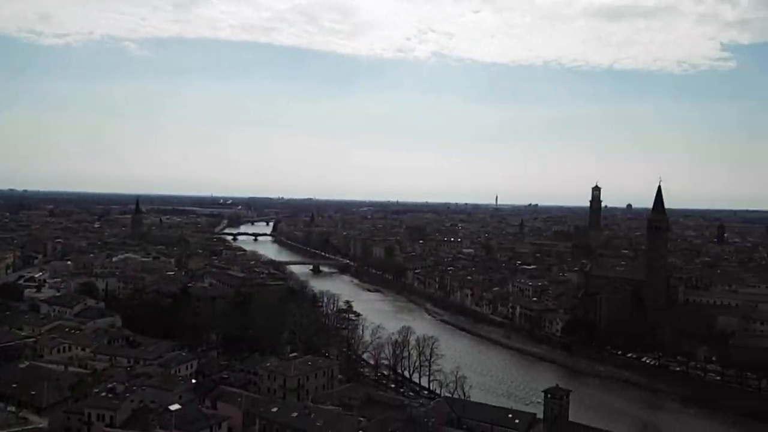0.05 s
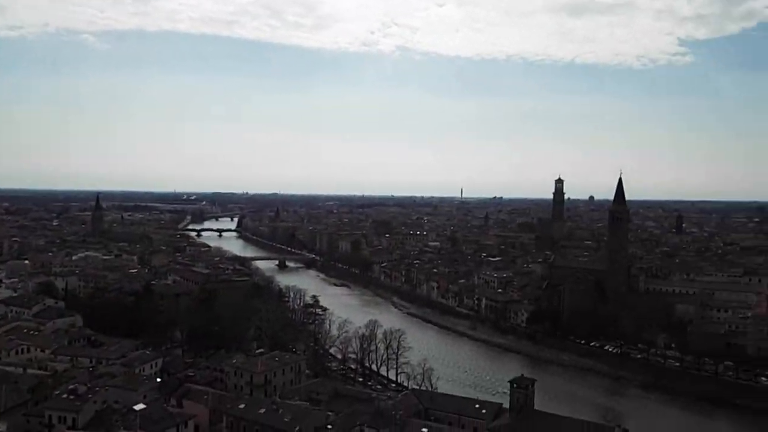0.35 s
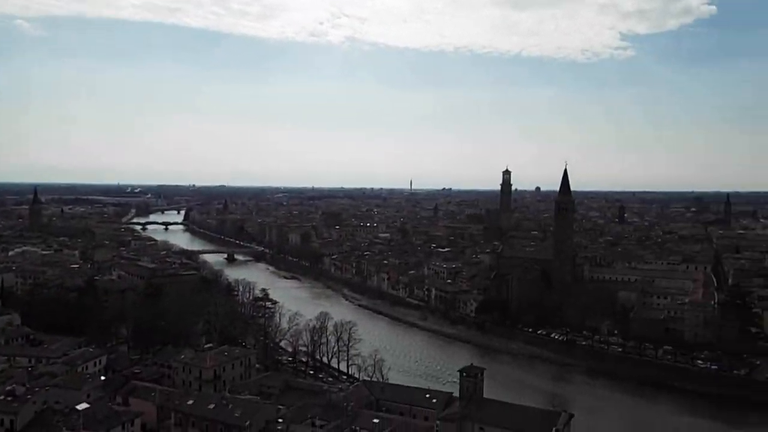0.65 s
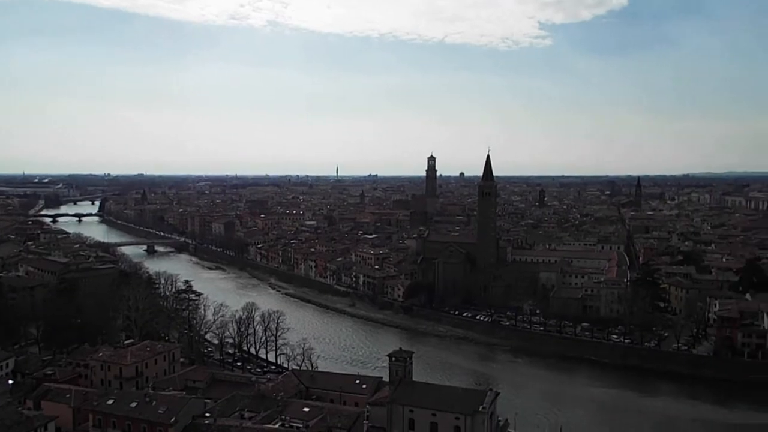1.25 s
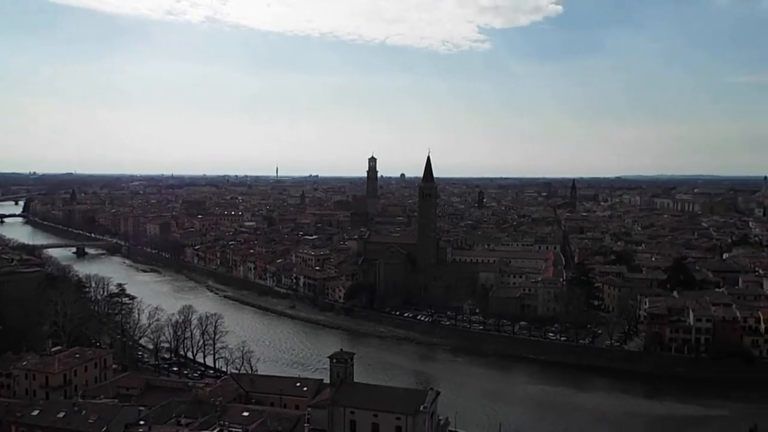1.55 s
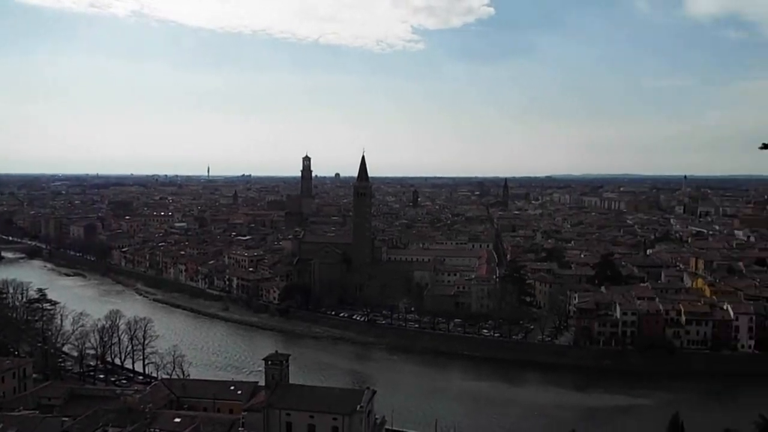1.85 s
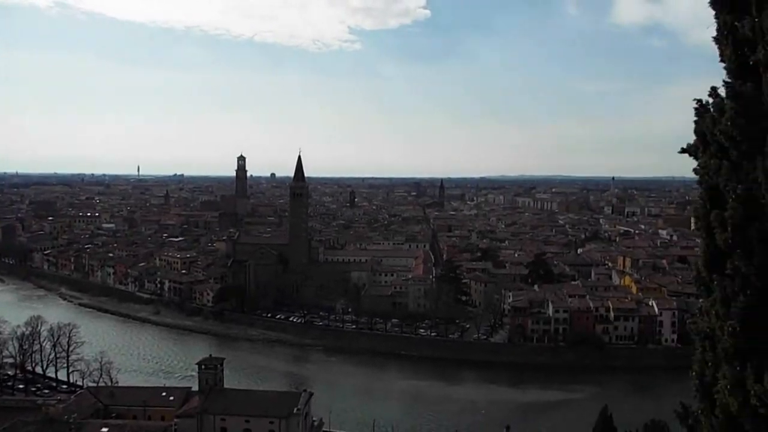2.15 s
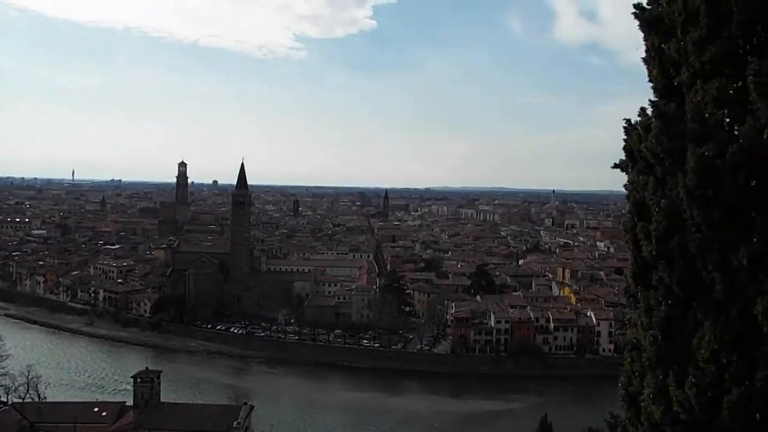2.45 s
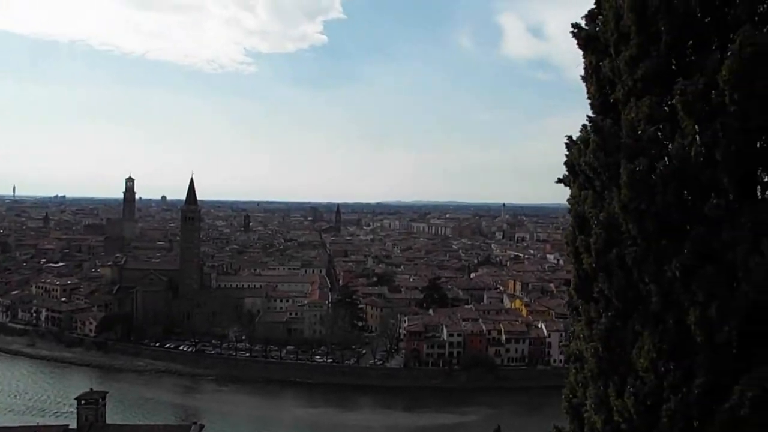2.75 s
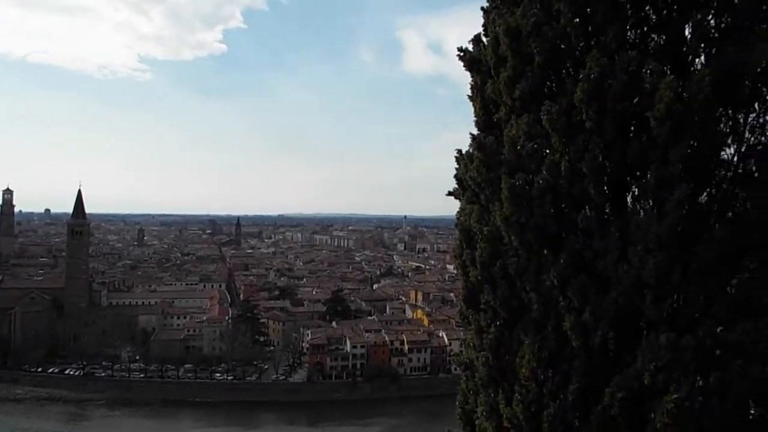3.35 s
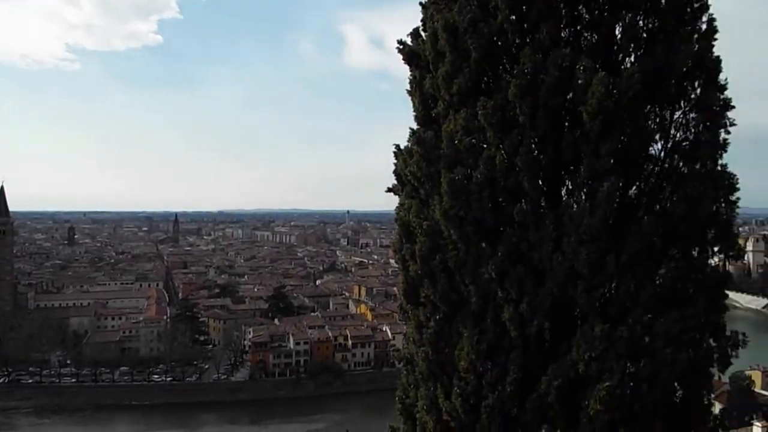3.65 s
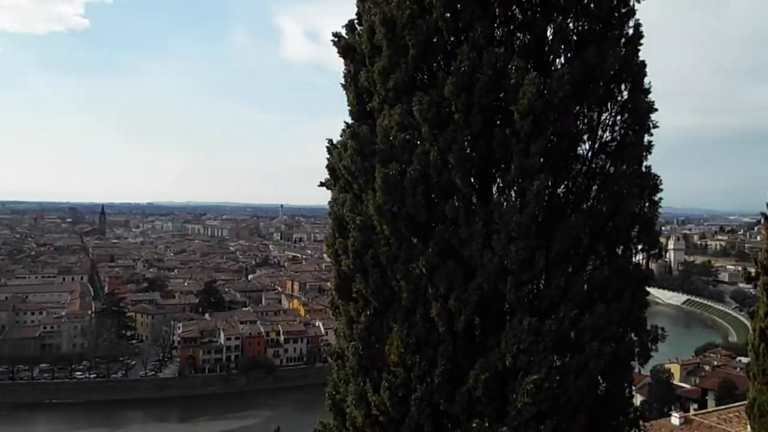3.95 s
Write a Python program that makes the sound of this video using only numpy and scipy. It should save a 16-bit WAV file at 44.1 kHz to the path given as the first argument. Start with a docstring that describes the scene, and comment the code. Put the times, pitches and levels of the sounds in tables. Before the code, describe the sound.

Gusty wind buffets the microphone, with faint metal clinks and a distant town behind.

```python
"""Gusty wind buffets a stereo microphone on a hill above a town. It opens mid-gust: eddies sweep past
each port, louder and higher the faster the air, and tight ones slap it, while a small bird whistles.
Lulls around 0.5 s and 1 s uncover the distant town and a little metal fitting that clinks now and then.
The hardest gust peaks near 2 s, crackling and overloading the recorder. A choppy lull with soft rustles
follows; one more gust hits just after 3 s and eases off in scattered buffets and a last few clinks."""
import sys
import numpy as np
from scipy import signal
from scipy.fft import rfft, irfft
from scipy.io import wavfile
from scipy.ndimage import map_coordinates

SR = 44100
rng = np.random.default_rng(int(sys.argv[2]) if len(sys.argv) > 2 else 0)


def dump_mix(stems):
    """Bounce the given channels to the path in sys.argv[1] as a 16-bit WAV at rate SR."""
    frames = np.atleast_2d(stems).T  # one column per channel
    limited = np.clip(frames, -1, 1)  # hard clip at full scale
    pcm = np.round(limited * 32767).astype(np.int16)
    wavfile.write(sys.argv[1], SR, pcm)


N = 176400
TIME = np.arange(N) / SR


def amp(db):
    """Decibels to gain."""
    return 10 ** (np.asarray(db) / 20)


def unit(x):
    """Scales to rms 1."""
    return x / np.sqrt(np.mean(x ** 2) + 1e-20)


def add(mix, start, sound):
    """Mixes a sound in at a start time in seconds."""
    part = mix[max(round(start * SR), 0):][:len(sound)]
    part += sound[:len(part)]


def noise(spectrum):
    """Noise of rms 1, shaped by an EQ curve."""
    hz, db = np.transpose(spectrum)
    f = np.fft.rfftfreq(N, 1 / SR)
    eq = amp(np.interp(np.log(f + 1), np.log(hz), db)) * (f > 0)
    return unit(irfft(rfft(rng.standard_normal(N)) * eq, N))


def stereo_noise(spectrum, correlation):
    """Shaped noise, from fully wide (correlation 0) to mono (1)."""
    centre = noise(spectrum)
    sides = np.array([noise(spectrum), noise(spectrum)])
    return np.sqrt(correlation) * centre + np.sqrt(1 - correlation) * sides


def wobble(top_hz):
    """Random modulator of rms 1, from a tenth of top_hz to a roll-off at top_hz."""
    f = np.fft.rfftfreq(N, 1 / SR) / top_hz
    return unit(irfft(rfft(rng.standard_normal(N)) * np.exp(-f ** 2 / 2) * (f > 1 / 10), N))


# EQ of the town bed: f/Hz, level/dB
TOWN_EQ = [(60, 5), (250, 8.5), (480, 0.5), (760, 4), (1100, -5), (1600, -9), (2600, -16), (4200, -24.5),
           (6500, -29.5), (9500, -35.5), (13000, -38), (16000, -38)]
def town():
    """The distant town and hiss: a steady, nearly mono bed."""
    return amp(-34.5) * stereo_noise(TOWN_EQ, correlation=0.82)


# Whistle cues: t/s, length/s, level/dB, start f/Hz, middle f/Hz, end f/Hz
WHISTLES = [(0.062, 0.07, -50, 2950, 3130, 3120), (0.215, 0.092, -42, 3810, 3000, 2970),
            (0.517, 0.045, -47.5, 2810, 3090, 2860)]
def bird():
    """A small bird's thin, wavering whistles, each bending through three pitches."""
    out = np.zeros(N)
    for start, length, db, *pitches in WHISTLES:
        progress = np.arange(0, length, 1 / SR) / length
        waver = 1 + 0.017 * wobble(150)[:len(progress)]
        hz = np.interp(progress, [0, .35, 1], pitches) * waver
        envelope = amp(db) * np.abs(np.sin(np.pi * progress)) ** .5
        add(out, start, envelope * np.sin(2 * np.pi * np.cumsum(hz) / SR))
    return out


# Rustle cues: centre t/s, half width/s, level/dB
RUSTLES = [(2.373, 0.034, -53), (2.417, 0.019, -53), (3.349, 0.037, -57.5), (3.506, 0.032, -52),
           (3.98, .06, -49.5)]
# EQ of the friction: f/Hz, level/dB
RUSTLE_EQ = [(1500, -4), (2500, 4.5), (4500, 2), (9000, -4), (12000, -17), (16000, -15)]
def rustles():
    """Soft swells of grainy friction close to the microphone."""
    swell = sum(amp(db) * np.exp(-((TIME - centre) / width) ** 2) for centre, width, db in RUSTLES)
    grain = amp(2.5 * wobble(300))
    return swell * grain * stereo_noise(RUSTLE_EQ, correlation=0.2)


# Taps on the fitting: t/s, level/dB, brightness/(dB per octave), ring length factor
CLINKS = [(.212, -42, 15, 1), (.219, -35, 10.5, 0.8), (.935, -47, -8, 0.97), (0.988, -39, -5, 1),
          (1.003, -41, -6, 1), (1.248, -43, 16, 0.36), (1.510, -29, -5.5, 0.28), (1.52, -35.5, -12, 0.4),
          (2.859, -43, 11, 0.25), (3.449, -26.5, -15, 0.46), (3.529, -39, -4.5, 0.21)]
# Modes of the fitting: f/Hz, level/dB, 60 dB decay/s
METAL_MODES = [(4400, -18, 0.055), (5790, -9, 0.088), (6460, -8, 0.086), (6480, -6, .08), (7340, -19, .06),
               (8220, -8.5, 0.034), (8900, -14.5, 0.055), (9800, -15, .06)]
def clinks():
    """A small metal fitting ticks on contact and rings; each tap lands elsewhere, so its tone varies."""
    out, t = np.zeros((2, N)), np.arange(SR // 5) / SR
    hz, mode_db, t60 = np.transpose(METAL_MODES)[:, :, None]
    tick_band = signal.butter(2, [4200, 10500], "band", fs=SR, output="sos")
    attack = np.minimum(t / 0.00028, 1)
    for start, db, brightness, ring in CLINKS:
        detuned_hz = hz * (1 + 0.0053 * rng.standard_normal(hz.shape))
        for channel, pan_db in zip(out, (-0.5, 0.5)):
            struck_db = mode_db + brightness * np.log2(hz / 6400) + 3 * rng.standard_normal(hz.shape)
            partials = np.sin(2 * np.pi * (detuned_hz * t + rng.random(hz.shape) / 2))
            modes = (amp(struck_db - 60 * t / (t60 * ring)) * partials).sum(0)
            scrape = unit(signal.sosfilt(tick_band, rng.standard_normal(len(t))))
            tick = amp(-10.5) * scrape * np.exp(-t / (0.013 * ring ** 2))
            add(channel, start, amp(db + pan_db) * (modes + tick) * attack)
    return out


# EQ of the low end: f/Hz, level/dB
RUMBLE_EQ = [(8, -15), (22, -11), (42, -8), (70, -12), (130, -24.5), (220, -21.5), (500, -39),
             (2000, -91.5)]
# Level of the rumble, dipping in the lulls: t/s, level/dB
RUMBLE_LEVEL = [(0.0, -7), (0.43, -12), (0.46, -31), (0.69, -14.5), (0.71, -16.5), (0.86, -14.5),
                (0.98, -18.5), (1.04, -32), (1.08, -16.5), (2.35, -13.5), (2.375, -27), (2.416, -29.5),
                (2.43, -16), (2.504, -16.5), (2.53, -31), (2.565, -33), (2.59, -15), (2.755, -13.5),
                (2.775, -37), (2.8, -35), (2.82, -20.5), (2.9, -36.5), (2.97, -15.5), (3.04, -25),
                (3.07, -14), (3.54, -25), (3.75, -11.5), (3.8, -23.5), (3.98, -20.5), (4.0, -23)]
def rumble():
    """Slow pressure swings around the whole microphone, partly shared by both ports."""
    level_db = np.interp(TIME, *np.transpose(RUMBLE_LEVEL))
    return amp(level_db - 1) * stereo_noise(RUMBLE_EQ, correlation=0.22)


def crackle(force_db):
    """The smallest eddies pop at a port, thicker and louder as the force grows."""
    strength = amp(np.minimum(force_db, 3))
    pops_per_s = 170 * strength
    pops = (rng.random(N) < pops_per_s / SR) * rng.standard_normal(N)
    lowpass = signal.butter(1, 2600, fs=SR)
    return amp(-20.5) * signal.lfilter(*lowpass, pops * np.sqrt(strength))


# EQ of the eddies at nominal air speed: f/Hz, level/dB
EDDY_EQ = [(15, 8.5), (60, 3), (180, 3), (360, 3), (520, -5), (750, -10.5), (1050, -24.5), (1500, -32),
           (2200, -55.5), (4000, -81), (12000, -87)]
def eddies(force_db, shift_octaves):
    """A frozen field of eddies is carried past a port, so air speed sets both pitch and level."""
    flutter_db, shiver_db = 3 * wobble(50.23), 2 * wobble(260.5)
    force_db = force_db + flutter_db + shiver_db
    speed = np.minimum(2 ** (force_db / 13 + shift_octaves), 2)  # 13 dB of force doubles the speed
    pressure = map_coordinates(noise(EDDY_EQ), [np.cumsum(speed)], order=3, mode="wrap")
    return amp(-8.5 + 0.3 * force_db) * pressure + crackle(force_db)


NOMINAL_FORCE_DB = -12  # force of the air at nominal speed
# Force envelope of the gusts: t/s, left level/dB, right level/dB
GUSTS = [(0.0, -15.0, -19.0), (0.233, -17.5, -22.0), (0.39, -15.0, -16.5), (0.41, -26, -26),
         (0.439, -18, -20), (0.5, -22.0, -23.0), (0.512, -46.0, -44.0), (0.551, -48.5, -46),
         (0.601, -31, -32.5), (0.704, -30, -31), (0.729, -46, -46), (0.78, -29.0, -31.0),
         (0.88, -22.0, -23.5), (0.97, -46.5, -46.0), (1.043, -53.5, -54.0), (1.151, -27.0, -34.0),
         (1.28, -17.0, -22.0), (1.43, -19, -22), (1.453, -32, -34), (1.49, -18, -23), (1.555, -21, -25),
         (1.585, -30, -32), (1.65, -12.0, -14.0), (2.09, -12.0, -14), (2.23, -18.0, -18.0),
         (2.34, -27, -31), (2.385, -58.0, -58.0), (2.49, -46, -46.5), (2.555, -58, -58), (2.7, -52, -51.5),
         (2.785, -55.5, -56), (2.871, -34.5, -36), (2.91, -48.0, -46.0), (3.03, -29.0, -31.0),
         (3.15, -14.0, -11.5), (3.22, -23.5, -20), (3.3, -31.5, -23.0), (3.47, -34.5, -38.0),
         (3.61, -26.0, -34.5), (3.76, -32, -36), (3.8, -48.5, -48.0), (3.93, -47.5, -46),
         (4.0, -35.0, -38.0)]
# Buffets, short peaks of force: centre t/s, length/s, left level/dB, right level/dB
BUFFETS = [(0.031, 0.013, -3.0, -5.0), (0.089, 0.053, -11.0, -16.0), (0.167, 0.032, -9.0, -12.0),
           (0.316, 0.074, -9, -12.5), (0.368, 0.025, -7, -10), (0.436, 0.016, -6.0, -8.0),
           (0.483, 0.024, -13.0, -13.5), (0.569, 0.017, -17.0, -17), (0.631, 0.043, -18.5, -18.5),
           (0.692, 0.033, -19.0, -12.0), (0.858, 0.027, -10.0, -12.5), (1.11, 0.035, -17.5, -21.5),
           (1.204, 0.022, -9.5, -13.0), (1.358, 0.028, -6.0, -7.0), (1.424, 0.025, -8.0, -12.0),
           (1.52, 0.035, -8.0, -16.0), (1.672, 0.055, -6.0, -5.0), (1.762, 0.024, -6.0, -8.0),
           (1.845, 0.03, -8.0, -10.0), (1.986, 0.039, -8.5, -10), (2.107, 0.019, -10.0, -14.0),
           (2.194, 0.031, -15.0, -12.0), (2.237, 0.014, -11, -15), (2.455, 0.049, -15.5, -16.5),
           (2.507, 0.038, -25, -28), (2.596, 0.02, -15, -12), (2.672, 0.032, -18.0, -28.0),
           (2.73, 0.045, -14.5, -15), (2.814, 0.0165, -18.0, -34.5), (2.852, 0.026, -15.0, -16.0),
           (2.976, 0.044, -19.0, -18), (3.095, 0.064, -11.0, -8.0), (3.169, 0.074, -7.5, -7.5),
           (3.241, 0.017, -11.0, -5.5), (3.287, 0.011, -22, -14), (3.308, 0.00883, -22, -12.5),
           (3.367, 0.023, -21, -20.0), (3.42, 0.032, -28.0, -17.5), (3.508, 0.015, -18.0, -33.0),
           (3.571, 0.023, -16.5, -24.5), (3.654, 0.038, -19.5, -24), (3.724, 0.059, -19.5, -21.5),
           (3.959, 0.027, -13.5, -8.0)]
def wind_force(port):
    """Force of the air at one port in dB over nominal: the gust, lifted by each buffet."""
    gusts = np.array(GUSTS)
    gust_db = np.interp(TIME, gusts[:, 0], gusts[:, 1 + port])
    force_db = gust_db
    for centre, length, *peaks_db in BUFFETS:
        swell = np.exp(-np.abs((TIME - centre) / (.72 * length)) ** 4)  # flat top, steep flanks
        force_db = np.maximum(force_db, gust_db + swell * (peaks_db[port] - gust_db))
    return force_db - NOMINAL_FORCE_DB


def thumps():
    """The big eddy at the front of each buffet: a round thump that reaches the ports out of step."""
    out, t = np.zeros((2, N)), np.arange(-SR // 40, SR // 40) / SR
    for centre, length, *peaks_db in BUFFETS:
        hz = 28.7 / np.sqrt(length)  # shorter buffets thump higher
        cycles = t * hz
        envelope = np.exp(-(cycles / 0.65) ** 2)
        front = centre - 0.206 * length
        for channel, peak_db in zip(out, peaks_db):
            swing = envelope * np.sin(2 * np.pi * (cycles + rng.random()))
            add(channel, front + t[0], amp(-3.5 + 0.53 * (peak_db - NOMINAL_FORCE_DB)) * swing)
    return out


# Slap hits: t/s, left level/dB, right level/dB, f/Hz
SLAPS = [(0.0225, 5.5, -27, 330), (0.0322, 3.5, 0, 620), (0.0685, 2, -13, 467), (0.113, 8, -12, 287),
         (0.1672, -13, 1.5, 570), (0.206, 2, -10, 490), (0.3003, 1, -12, 706), (0.3332, 1.5, -4, 561.9),
         (0.3529, 5.5, -12, 400), (0.3919, 1, -4, 756), (0.4274, -2, -3, 513), (0.503, -17, 4.5, 640),
         (0.687, -19, -0.5, 430), (0.8446, 5.5, -4, 200.2), (0.8525, -2, 0, 679.9),
         (1.2319, 5.5, -4.5, 430), (1.3159, -1, -9.5, 580.2), (1.39, -4, 0.5, 627),
         (1.472, 3.5, -14, 379.6), (1.5272, 6.5, -2, 483.6), (1.568, 5.5, -10, 419.7),
         (1.7535, 2.5, -3, 735), (1.8074, -2.5, 4, 840), (1.858, 5, -6, 616), (1.913, 3, -7, 416),
         (1.9825, 3.5, 0, 699.1), (2.111, 3.5, -5, 479.7), (2.2369, 5.5, -5, 519.3), (2.437, 7, 0, 164.5),
         (2.715, 1, -1, 330), (2.813, 0.5, -12.5, 120.7), (2.848, 1, 0.5, 170.1), (2.989, -10, 6, 500),
         (3.068, -4.5, -1, 679.3), (3.1484, -0.5, -0.5, 761.2), (3.1985, 3, 3, 698.7),
         (3.237, -0.5, 2, 621.2), (3.2408, -8.5, 3, 559.8), (3.2791, -12, 2.5, 424.3),
         (3.5094, 2, -10, 380.6), (3.95, -10, -1, 476.3)]
def slaps():
    """A tight eddy hits a port head-on, swinging the pressure one way and snapping it back."""
    out, t = np.zeros((2, N)), np.arange(-SR // 60, SR // 60) / SR
    for centre, *levels_db, hz in SLAPS:
        phase, polarity = 2 * np.pi * hz * t, rng.choice([-1, 1])
        envelope = np.exp(-(t * hz / 0.66) ** 2)
        snap = 0.39 * np.tanh(phase)  # steepens the middle of the swing
        for port, db in enumerate(levels_db):
            offset = (port != np.argmax(levels_db)) * np.pi / 2  # the weaker port is out of step
            swing = envelope * np.sin(phase + offset + snap)
            add(out[port], centre + t[0], polarity * amp(db - 3.5) * swing)
    return out


# Colour of the wind as the microphone turns in it: t/s, pitch shift/octaves, level/dB
MIC_TURN = [(0, -0.086, -1.5), (0.44, -0.026, 0), (0.6, -0.26, 0.5), (1.098, -.2, 2), (1.4, -0.069, 1),
            (1.849, 0.09, -0.5), (2.3, -.2, 0), (2.45, -0.29, 1.5), (2.85, -0.32, 1.5), (3.079, .2, -1),
            (3.171, 0.11, 0), (3.3, 0.38, -3), (3.6, 0.095, -1.5), (4, -.05, -1)]
def wind():
    """Each port has its own eddies; both surge together, over the rumble and thumps."""
    times, octaves, db = np.transpose(MIC_TURN)
    shift_octaves, turn_db = np.interp(TIME, times, octaves), np.interp(TIME, times, db)
    surge_db = 1.62 * wobble(50.23)
    low_end = rumble()
    ports = np.array([eddies(wind_force(port) + surge_db, shift_octaves) for port in range(2)])
    return amp(turn_db) * (low_end + ports + thumps())


def scene():
    """Wind and slaps up front; town, clinks, rustles and bird behind them."""
    return wind() + slaps() + town() + clinks() + rustles() + bird()


# EQ of the overloaded input's sputter: f/Hz, level/dB
SPUTTER_EQ = [(500, -9.5), (2000, 12.5), (4000, 2), (8000, -5.5), (16000, -2.5)]
def record(dry):
    """The strongest eddies overload the recorder: it sputters and clips, then rolls off at 16 kHz."""
    overloaded = np.abs(dry) > 0.85
    sputter = amp(-46.5) * overloaded * stereo_noise(SPUTTER_EQ, correlation=0)
    distorted = np.clip(dry, -.96, .96) + sputter
    lowpass = signal.firwin(511, 16000, window=("kaiser", 9), fs=SR)
    padded = np.pad(distorted, ((0, 0), (255, 255)), "edge")
    return signal.oaconvolve(padded, lowpass[None], "valid", axes=1)


dry = scene()
out = record(dry)
dump_mix(out)
```